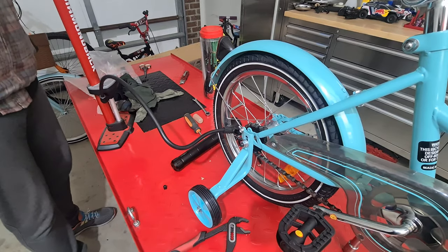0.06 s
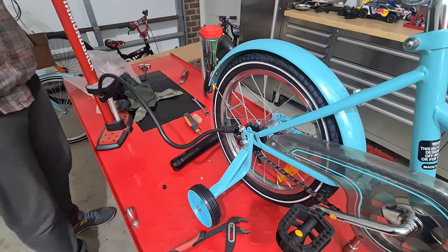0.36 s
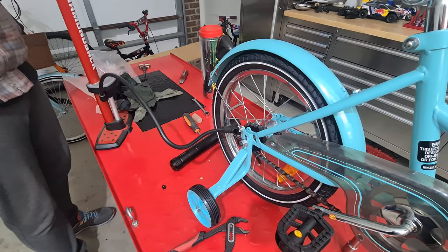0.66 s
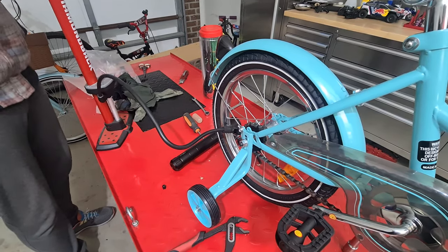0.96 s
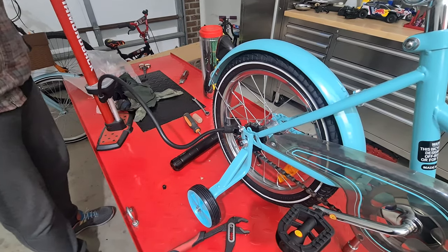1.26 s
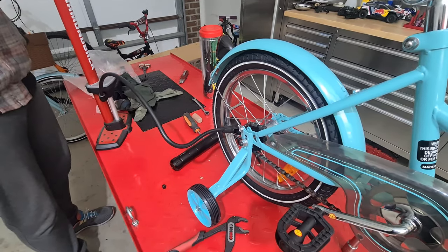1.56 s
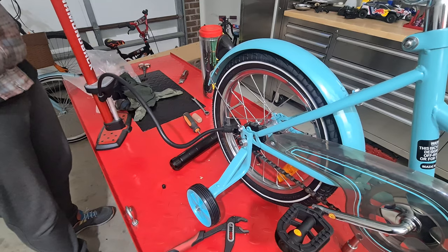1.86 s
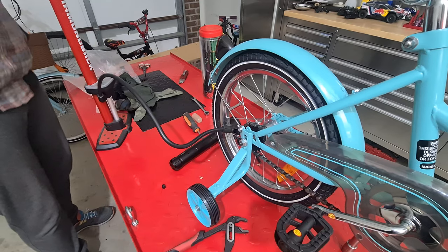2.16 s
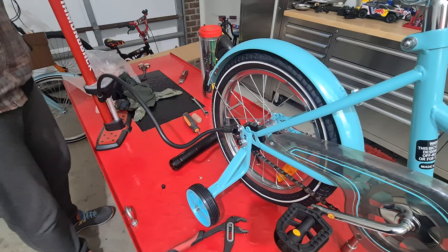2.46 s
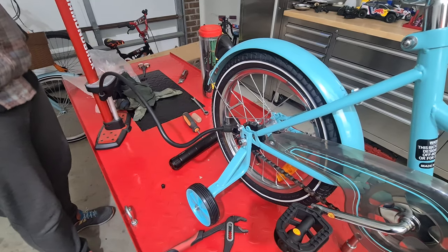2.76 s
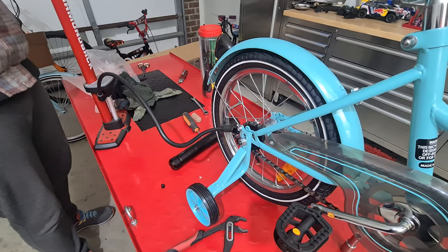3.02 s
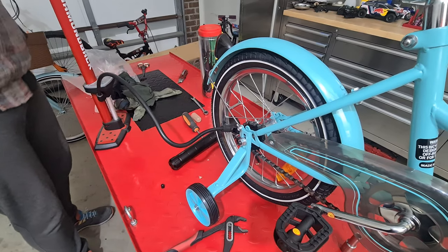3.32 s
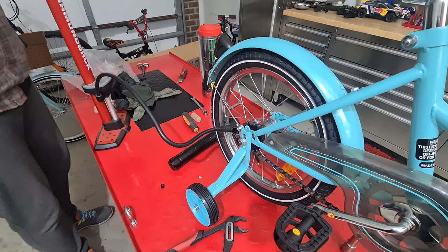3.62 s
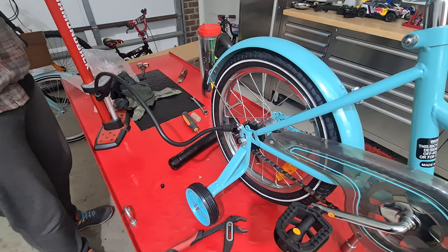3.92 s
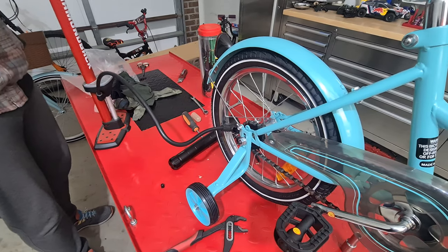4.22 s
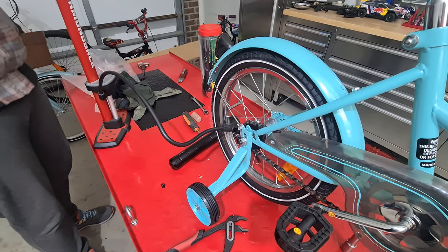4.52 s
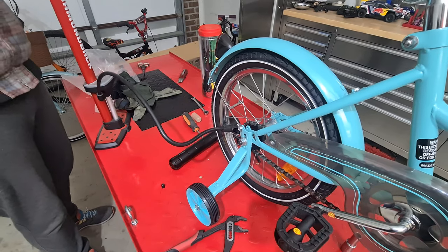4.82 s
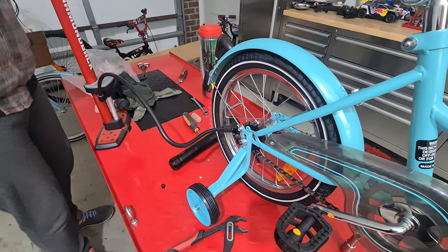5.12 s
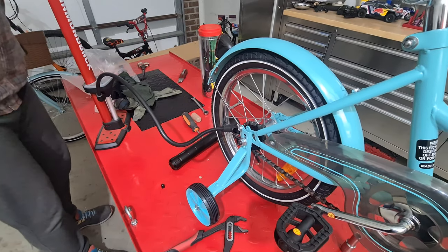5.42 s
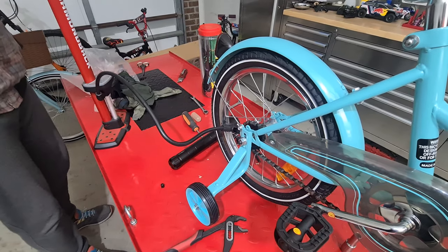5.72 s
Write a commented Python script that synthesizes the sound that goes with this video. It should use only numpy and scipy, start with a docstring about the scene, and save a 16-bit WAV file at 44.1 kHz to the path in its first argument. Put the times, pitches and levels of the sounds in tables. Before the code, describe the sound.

Close, steady strokes of a floor pump push air into a bike tyre, with piston knocks, handle rattles and faint squeaks.

```python
"""A rush of air ends in a thud and a clack: a floor pump is inflating a bicycle tyre in a garage,
close to the microphone. Air is drawn in on each upstroke and rushes through barrel, hose and valve on
each downstroke. Four strokes bottom out; one stops short. The handle rattles, the foot bumps the floor,
the piston seal squeaks faintly and the hard walls ring on over a low, steady room tone."""
import sys
import numpy as np
from scipy import signal
from scipy.fft import rfft, irfft, next_fast_len
from scipy.io import wavfile
from scipy.ndimage import map_coordinates

SR = 44100
rng = np.random.default_rng(int(sys.argv[2]) if len(sys.argv) > 2 else 0)


def generate_wav(sig):
    """Save sig (samples, or channels by samples) to the path in sys.argv[1] as 16-bit PCM at SR."""
    pcm = np.round(np.clip(np.atleast_2d(sig).T, -1, 1) * 32767).astype(np.int16)
    wavfile.write(sys.argv[1], SR, pcm)


N = 254898
TIME = np.arange(N) / SR
AGE = np.arange(SR) / SR  # seconds into a single event

# The piston hits bottom. Each row: time in seconds, thud, body ring and clack in dB, clack tilt in dB
# an octave, metal ping in dB, rebound delay in seconds, rebound in dB. Levels are relative throughout.
PISTON_STOPS = [(0.128, -10, -26, -17.5, -0.5, -43, 0.0215, -9),
                (1.263, -16, -27, -22.5, -1.4, -65, 0.0095, -19),
                (2.382, -10, -23.5, -17, -0.5, -37.5, 0.015, -13),
                (5.3506, -12.5, -26, -16.5, -1, -40.5, 0.025, -10)]
# The handle is pulled up. Each row: start and end in seconds, inlet port, valve, barrel and hose in dB.
UPSTROKES = [(0.435, 0.692, -56, -63.5, -67, -68), (1.55, 1.843, -55.5, -63, -66, -61),
             (2.672, 3.01, -58, -64, -68, -65), (4.307, 4.7, -60.5, -69.5, -65, -60.5)]
# The handle is pushed down. Each row: start, hardest push and tyre valve shutting in seconds, then
# inlet port, barrel, hose, surge, valve hiss and its ebb after the push in dB.
DOWNSTROKES = [(-0.25, 0.116, 0.26, -59, -53.5, -55, 8.5, -54.5, 6),
               (0.86, 1.26, 1.37, -61, -63, -60, 4.5, -53, 1),
               (2.038, 2.354, 2.45, -58.5, -61, -58.5, 15, -54, -5),
               (3.158, 3.498, 3.743, -58, -58.5, -59, 9.5, -53.5, 13.5),
               (4.848, 5.365, 5.505, -59.5, -59.5, -59, 9.5, -54.5, 12)]
# The check valve pops open. Each row: time in seconds, inlet port, valve hiss and hose in dB.
VALVE_PUFFS = [(0.883, -53.5, -56.5, -54), (1.047, -50, -50.5, -72), (1.79, -58, -57.5, -60),
               (1.966, -55.5, -67, -55.5), (2.16, -59.5, -64, -68), (2.955, -56.5, -66.5, -57.5),
               (3.17, -69, -54.5, -68), (3.26, -57.5, -69, -53)]
# Handle and rod click in their play. Each row: time in seconds, level in dB, tilt in dB an octave,
# rod ring in dB, contact pitch in Hz, contact level in dB.
HANDLE_CLICKS = [(1.872, -47, 0, -50.5, 1520, -52), (3.048, -28.5, -1, -36, 4200, -32),
                 (3.0694, -28.5, -1, -35, 3360, -26), (3.121, -46, 15, -37.5, 990, -30),
                 (3.834, -50.5, -2, -61, 795, -40), (4.053, -65.5, 2.5, -85, 1880, -50.5),
                 (4.093, -64, -5, -74, 1206, -51.5), (4.206, -54, 0, -67, 1040, -45),
                 (4.725, -27.5, 0.5, -33, 3250, -26), (4.762, -36.5, -3, -51, 6100, -35),
                 (4.85, -37, 1, -59, 1200, -27.5)]
# The pump rocks on its foot. Each row: time in seconds, bump in dB, plate ring in dB.
FOOT_BUMPS = [(0.706, -43.5, -70), (0.729, -47, -69), (0.787, -44, -64), (0.846, -57, -54),
              (0.898, -45, -65), (1.874, -48.5, -55), (1.967, -46.5, -50), (2.957, -43, -47),
              (3.075, -34.5, -35.5), (3.116, -47, -55), (3.631, -34.5, -27.5), (3.658, -41, -30.5),
              (4.639, -54, -51.5), (4.756, -29.5, -36.5), (4.934, -37, -43), (5.018, -61, -41.5)]
# The seal squeaks. Each row: start and length in seconds, first and last pitch in Hz, level in dB.
SEAL_SQUEAKS = [(0.022, 0.085, 1313, 1100, -45), (0.891, 0.04, 1120, 1055, -47.5),
                (2.049, 0.15, 1210, 1172, -52), (2.081, 0.118, 435, 390, -50),
                (4.234, 0.2, 2750, 2615, -58.5), (4.295, 0.094, 923, 886, -59.5),
                (4.538, 0.048, 1345, 1350, -54), (4.97, 0.308, 1205, 1148, -53.5),
                (5.161, 0.62, 820, 759, -45)]

# Ringing of the struck parts. Each row: frequency in Hz, level in dB, seconds to fall 60 dB.
BODY_MODES = [(59.56, -15, 1.76), (77.3, -11.5, 0.88), (111.8, -8, 1.14), (124, -13.5, 0.19),
              (141.2, -1, 0.37), (185.4, -7, 0.75), (235, -13, 0.15), (300.4, -3, 0.63), (351, -0.5, 0.28),
              (386, -14.5, 0.45), (395, -12.5, 1.145), (553, -12, 0.67), (592, -8.5, 0.56), (625, -45, 0.4),
              (734, -11.5, 0.68), (821, -3.5, .5), (845, -15.5, 0.26), (1001, -9.5, 0.76),
              (1110, -8.5, 0.18), (1092, -11.5, 0.28), (1195, -7, 0.48), (1313, -14, 0.44),
              (1623, -22.5, 0.55), (2020, -24, 0.37), (2760, -32, .2), (2996, -17.5, 0.66),
              (4390, -14.5, 0.39)]  # pump and floor together
PING_MODES = [(11530, 0, .27)]  # thin metal on a hard stop
ROD_MODES = [(361.7, -2.5, 0.51), (1020, -9, 0.36), (1062, -1, 0.33), (1200, 0.5, 0.12), (1360, -3, 0.18),
             (1580, -10, 0.37), (1949, -15, 0.34), (3680, -1, 0.03)]
FOOT_PLATE_MODES = [(77, -3.5, 0.21), (125, 3.5, 0.12), (141.6, -10, 0.78), (198, 2, 0.67), (218, -27, 0.1),
                    (317.2, -3.5, 0.38)]
# Resonances of the air passages. Each row: frequency in Hz, width in Hz, level in dB.
PORT_RESONANCES = [(1320, 30, 12.5), (3200, 2200, 2), (5590, 135, 12), (5670, 120, -11.5),
                   (6190, 180, 10.5), (6170, 120, -12), (6820, 460, 4), (10440, 310, 5), (11050, 100, 2),
                   (11600, 1200, -2.5), (15350, 250, -4)]
BARREL_RESONANCES = [(290, 33, 3.5), (714, 40, 1), (806, 9.9, 9.5), (1055, 13, 10), (1170, 70, 5.5),
                     (1364, 44, 6.5), (1650, 67, 7), (1880, 1100, -3)]
# Colours of the blows, air streams and room tone. Each row: frequency in Hz, spectral level in dB.
THUD_SPECTRUM = [(25, 0.5), (60, -16), (130, 2), (220, -5.5), (340, -16), (500, -13), (750, 0),
                 (1100, -7.5), (2000, -30), (6000, -38), (16000, -72)]
CLACK_SPECTRUM = [(60, -77), (200, -11.5), (330, 6.5), (470, -1.5), (750, -5.5), (1080, -1), (1700, -1),
                  (2250, -6.5), (2950, -5.5), (4600, -8), (6300, -9.5), (8500, -19), (12000, -22.5),
                  (16000, -21.5)]
CLICK_SPECTRUM = [(60, 4.5), (200, -7), (350, 4), (560, -1), (1000, 3), (1450, -0.5), (2200, -8.5),
                  (3600, -9), (6000, -19.5), (9000, -27.5), (16000, -44.5)]
BUMP_SPECTRUM = [(25, -30), (60, -21.5), (120, 4), (200, -9), (270, -4.5), (360, -3), (520, -13.5),
                 (1100, -19), (2000, -30), (6000, -35.5), (16000, -79)]
VALVE_SPECTRUM = [(3000, -49), (7000, -4), (8500, -14), (9500, -3.5), (11300, 1.5), (13200, 1),
                  (15200, 5.5), (16000, -6)]
HOSE_SPECTRUM = [(1200, -75), (2200, -8), (2900, 7), (3400, 1.5), (3900, 1), (5000, -7.5), (6500, -5),
                 (8500, -18), (16000, -47)]
ROOM_TONE_SPECTRUM = [(25, -5.5), (70, 3), (130, -4.5), (240, -16), (370, -9), (520, -19), (1100, -22.5),
                      (2500, -31.5), (7000, -36.5), (8200, -46.5), (16000, -41)]
# Echoes off the nearby bench, cabinet and wall. Each row: delay in milliseconds, level in dB.
NEAR_ECHOES = [(1.3, -62.5), (2.1, -34), (3.7, -35), (5.9, -25.5), (8.3, -14)]
# The garage's reverberation. Each row: frequency in Hz, seconds to fall 60 dB.
GARAGE_DECAY = [(60, 0.71), (160, 0.72), (420, 0.65), (1100, 0.61), (2900, 0.67), (5500, 0.53), (8000, .42),
                (14000, 0.24)]


def piston_stops():
    """The rubber stop thuds and squashes flat, the hard parts clack, the pump kicks back and rings."""
    out = np.zeros(N)
    for s, thud_db, body_db, clack_db, tilt, ping_db, rebound_s, rebound_db in PISTON_STOPS:
        thud = blow(THUD_SPECTRUM, rise=0.0012, t60=0.04, room_db=-11.5, room_rise=0.03)
        add(out, s, amp(thud_db) * (amp(-2.5) * thud + amp(1) * rubber_bounces()))
        add(out, s, -amp(rebound_db) * pressure_swing(width_s=0.0011, delay_s=rebound_s))
        squashed = s + 0.0085
        add(out, squashed, amp(body_db) * ring(BODY_MODES, rise=0.0019, blur=0.13))
        clack = blow(tilted(CLACK_SPECTRUM, tilt), rise=0.00061, t60=0.087, room_db=-2, room_rise=0.0069)
        add(out, squashed, amp(clack_db) * clack)
        add(out, squashed, amp(ping_db) * ring(PING_MODES, rise=0.002, blur=0.51))
    return out


def rubber_bounces(width_s=0.0017, first_s=0.00407, interval_s=0.00422, loss_db=2):
    """The rubber stop rebounds, each swing opposite to the last and weaker."""
    return sum((-1) ** k * amp(-loss_db * k) * pressure_swing(width_s, first_s + k * interval_s)
               for k in range(8))


def pressure_swing(width_s, delay_s):
    """One pulse of pressure as the rubber squashes and springs back."""
    u = (AGE - delay_s) / width_s
    return (1 - 2 * u ** 2) * np.exp(-u ** 2)


def air(flutter_db=1.3):
    """Turbulence in inlet port, tyre valve, barrel and hose flutters as the seal drags unevenly."""
    port_flow, valve_flow, barrel_flow, hose_flow = air_flows()
    flutter = amp(flutter_db * wobble(40, N))
    port = amp(flutter_db * wobble(22.12, N)) * port_flow * resonant_noise(PORT_RESONANCES)
    valve = amp(flutter_db * wobble(26.11, N)) * valve_flow * noise(VALVE_SPECTRUM, N)
    barrel = flutter * barrel_flow * resonant_noise(BARREL_RESONANCES)
    hose = flutter * hose_flow * noise(HOSE_SPECTRUM, N)
    return amp(2.5) * (port + valve + barrel) + hose


def air_flows():
    """Gains of the streams in port, valve, barrel and hose, summed in power over strokes and puffs."""
    port, valve, barrel, hose = [], [], [], []
    for start, end, port_db, valve_db, barrel_db, hose_db in UPSTROKES:
        sag_db = 6 * travel(start, end)  # the pull slows towards the top
        pull = gate(start, end) - sag_db
        port.append(port_db + pull)
        valve.append(valve_db + pull)
        barrel.append(barrel_db + pull)
        hose.append(hose_db + pull - sag_db)
    for start, peak, shut, port_db, barrel_db, hose_db, surge_db, valve_db, ebb_db in DOWNSTROKES:
        stroke = gate(start, peak)
        depth = travel(start, peak)
        surge = surge_db * np.exp(-((TIME - peak) / 0.11) ** 2)  # swells around the hardest push
        pressure_db = 7.5 * (depth - 1) + 0.19 * surge - ebb_db * travel(peak, shut)
        port.append(port_db + stroke - 7.5 * depth)  # draws less as the piston goes down
        valve.append(valve_db + pressure_db + gate(start, shut, fall=330))
        barrel.append(barrel_db + stroke + surge)
        hose.append(hose_db + stroke + 0.63 * surge)
    for s, port_db, valve_db, hose_db in VALVE_PUFFS:
        puff = gate(s, s, rise=700, fall=188)
        port.append(port_db + puff)
        valve.append(valve_db + puff)
        hose.append(hose_db + puff)
    silence_db = -140
    return [np.sqrt(sum(amp(np.maximum(db, silence_db)) ** 2 for db in stream))
            for stream in (port, valve, barrel, hose)]


def handle_rattle():
    """Sharp light clicks as the rod shifts in its guide: the contact snaps and the rod rings."""
    out = np.zeros(N)
    for s, db, tilt, rod_db, contact_hz, contact_db in HANDLE_CLICKS:
        click = blow(tilted(CLICK_SPECTRUM, tilt), rise=0.0005, t60=0.011, room_db=-13, room_rise=0.0026)
        rod = ring(ROD_MODES, rise=0.00067, blur=0.74)
        snap = ring([(contact_hz, 0, 0.01)], rise=0.00027, blur=4.4, scatter_db=0)
        add(out, s, amp(db + 4) * click + amp(rod_db - 4) * rod + amp(contact_db) * snap)
    return out


def foot_bumps():
    """The pump's foot bumps dully on the concrete; its plate rings low."""
    out = np.zeros(N)
    for s, db, plate_db in FOOT_BUMPS:
        bump = blow(BUMP_SPECTRUM, rise=0.0041, t60=0.082, room_db=-6, room_rise=0.013)
        plate = ring(FOOT_PLATE_MODES, rise=0.002, blur=0.32)
        add(out, s, amp(db) * bump + amp(plate_db - 9) * plate)
    return out


def seal_squeaks():
    """The greased piston seal gives short, unsteady, breathy squeaks."""
    out = np.zeros(N)
    for s, length, start_hz, end_hz, db in SEAL_SQUEAKS:
        progress = np.clip(AGE / length, 0, 1)
        hz = start_hz + (end_hz - start_hz) * progress + 85 * wobble(342, SR)
        envelope = amp(db + 2.5 * wobble(120, SR)) * np.sin(np.pi * progress)
        add(out, s, envelope * np.sin(2 * np.pi * np.cumsum(hz) / SR))
    return out


def near_surfaces(x, above_hz):
    """Small hard surfaces near the pump throw back the short waves and comb the treble."""
    echoes = lambda hz: sum(amp(db) * np.exp(-2j * np.pi * hz * ms / 1000) for ms, db in NEAR_ECHOES)
    highpass = lambda hz: (1j * hz / (above_hz + 1j * hz)) ** 2
    return filtered(x, lambda hz: 1 + echoes(hz) * highpass(hz))


def garage_tail(spectrum):
    """Farther off, the hard walls ring on after a blow; the treble dies first."""
    hz, t, bands = signal.stft(noise(spectrum, SR), SR, nperseg=512)
    decay = amp(-60 * t / along(GARAGE_DECAY, hz)[:, None])
    return signal.istft(bands * decay, SR, nperseg=512)[1][:SR]


def room_tone():
    """The garage's low, steady background."""
    return amp(-59) * noise(ROOM_TONE_SPECTRUM, N)


def blow(spectrum, rise, t60, room_db, room_rise):
    """An impact's burst of noise, then the garage's answer; rises and t60 are in seconds."""
    burst = noise(spectrum, SR) * amp(-60 * AGE / t60) * onset(rise)
    return burst + amp(room_db) * garage_tail(spectrum) * onset(room_rise)


def ring(modes, rise, blur, scatter_db=2):
    """Struck modes of alternating sign; strengths scatter and phases wander by about blur radians."""
    out = np.zeros(SR)
    for k, (hz, db, t60) in enumerate(modes):
        phase = 2 * np.pi * hz * AGE + blur * wobble(24.5, SR) * onset(t60 / 10)
        struck_db = db + scatter_db * rng.standard_normal()
        out += (-1) ** k * amp(struck_db - 60 * AGE / t60) * np.sin(phase)
    return out * onset(rise)


def noise(spectrum, size):
    """Coloured noise of rms 1."""
    gain = amp(along(spectrum, np.fft.rfftfreq(size, 1 / SR)))
    return unit(irfft(rfft(rng.standard_normal(size)) * gain, size))


def resonant_noise(peaks):
    """Noise of rms 1 through a set of resonances."""
    def response(f):
        power = sum(amp(db) ** 2 * (f * width) ** 2 / ((hz ** 2 - f ** 2) ** 2 + (f * width) ** 2)
                    for hz, width, db in peaks)
        return np.sqrt(power)
    return unit(filtered(rng.standard_normal(N), response))


def gate(start, end, rise=188, fall=73):
    """Flow level in dB: full from start to end, building and dying by rise and fall dB a second."""
    return -rise * np.maximum(start - TIME, 0) - fall * np.maximum(TIME - end, 0)


def travel(start, end):
    """Progress from start to end, 0 to 1."""
    return np.clip((TIME - start) / (end - start), 0, 1)


def onset(seconds):
    """An attack from 0 to 1 with this time constant."""
    return 1 - np.exp(-AGE / seconds)


def wobble(rate, size):
    """A smooth random curve, rate knots a second."""
    return map_coordinates(rng.standard_normal(size), [np.arange(size) * rate / SR])


def tilted(spectrum, slope):
    """A spectrum tilted by slope dB an octave, pivoting at 1 Hz."""
    return [(hz, db + slope * np.log2(hz)) for hz, db in spectrum]


def along(points, hz):
    """(Hz, value) points read on a log axis."""
    knots_hz, values = np.transpose(points)
    return np.interp(np.log(hz + 1), np.log(knots_hz + 1), values)


def filtered(x, response):
    """x through a frequency response."""
    size = next_fast_len(N + SR)
    return irfft(rfft(x, size) * response(np.fft.rfftfreq(size, 1 / SR)), size)[..., :N]


def add(track, s, sound):
    """Mix a sound into the track at s seconds."""
    span = track[max(round(s * SR), 0):][:len(sound)]
    span += sound[:len(span)]


def amp(db):
    """Decibels to gain."""
    return 10 ** (np.asarray(db) / 20)


def unit(x):
    """Scale to rms 1."""
    return x / np.sqrt(np.mean(x ** 2) + 1e-20)


def scene():
    """The pump close by, the garage's room tone behind it, in mono."""
    pump = piston_stops() + handle_rattle() + foot_bumps() + seal_squeaks() + air()
    return (near_surfaces(pump, above_hz=710) + room_tone())[None]


def record(dry):
    """The microphone loses the deep bass and keeps nothing above its band limit."""
    low_hz, top_hz = 45, 15780
    bass_loss = lambda hz: -hz ** 2 / (low_hz ** 2 - hz ** 2 + 1j * np.sqrt(2) * low_hz * hz)
    return filtered(dry, lambda hz: bass_loss(hz) * (hz < top_hz))


dry = scene()
out = record(dry)
generate_wav(out)
```